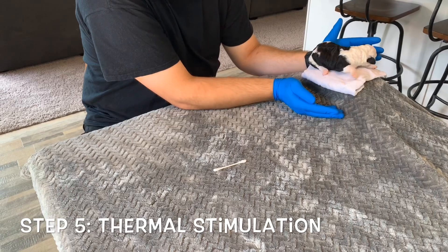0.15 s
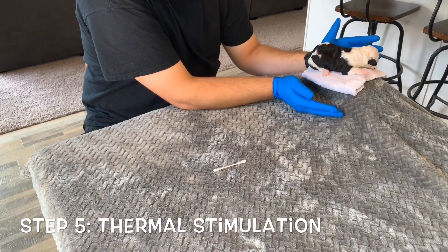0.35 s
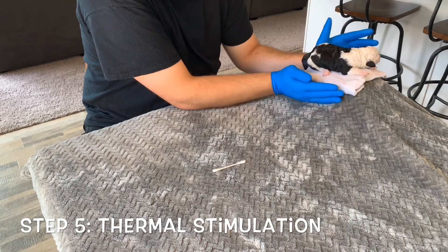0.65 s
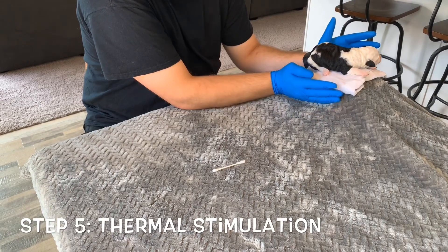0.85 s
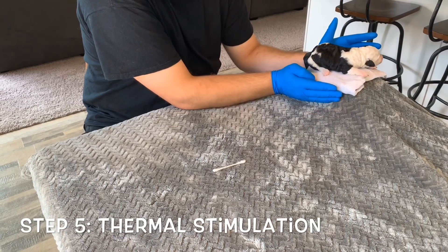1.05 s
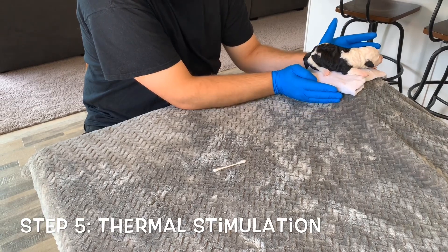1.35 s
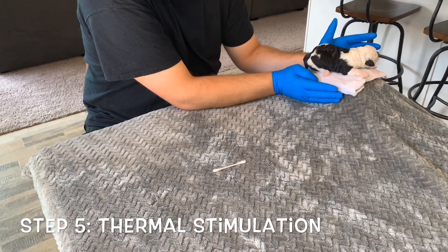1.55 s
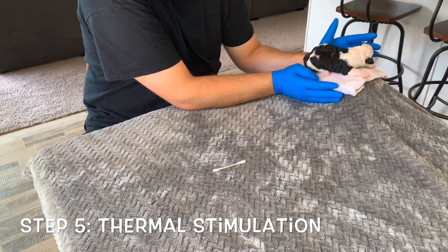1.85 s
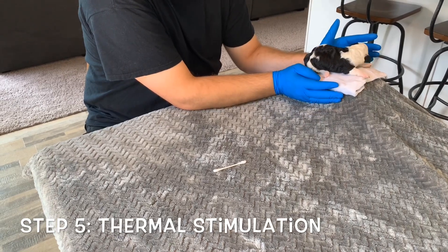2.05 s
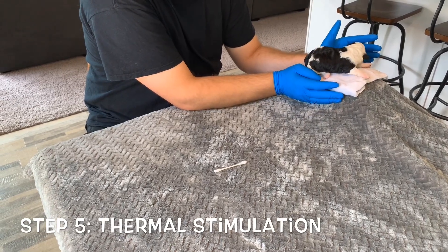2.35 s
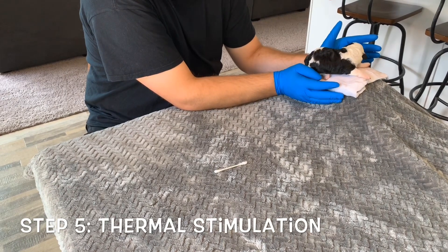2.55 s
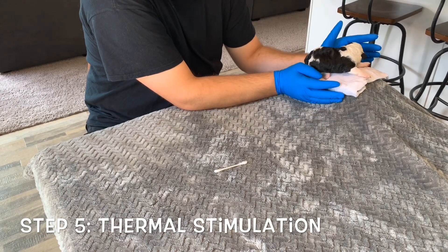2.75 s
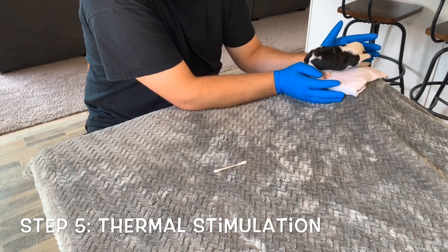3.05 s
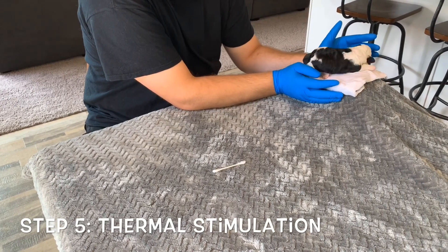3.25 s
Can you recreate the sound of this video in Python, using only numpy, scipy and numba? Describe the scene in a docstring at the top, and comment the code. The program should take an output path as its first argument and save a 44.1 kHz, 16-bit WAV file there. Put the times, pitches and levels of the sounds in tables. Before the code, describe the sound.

In a slightly echoing room with a faint ventilation hum, a newborn puppy gives eight short, evenly spaced cries. It starts with a soft whine, then switches between raspy squeals and clearer whimpers, ending on its strongest cry.

```python
"""Cries of a newborn puppy

A puppy cries eight times in a live room, whose walls ring on over a low, steady ventilation hum.
Each cry follows the source-filter principle: the vocal folds give a harmonic series that arches up and
down in pitch, and throat, mouth and nose shape its spectrum. Soft cries stay clear; in hard ones the
folds vibrate irregularly and break into a hoarse squeal with subharmonics."""
import sys
import numpy as np
from scipy import signal
from scipy.fft import rfft, irfft
from scipy.io import wavfile
from scipy.ndimage import uniform_filter1d
from numba import njit

SR = 44100
rng = np.random.default_rng(int(sys.argv[2]) if len(sys.argv) > 2 else 0)


def transcribe(signal):
    """Save signal, clipped to [-1, 1], as a 16-bit WAV file at the path in sys.argv[1]."""
    frames = np.atleast_2d(signal).T
    limited = np.clip(frames, -1, 1)
    pcm = np.round(limited * 32767).astype(np.int16)
    wavfile.write(sys.argv[1], SR, pcm)


N = 149940

# Spectrum of the ventilation: f/Hz, relative spectral level/dB
VENT_SPECTRUM = [(25, -51), (65, -21), (110, -20), (200, -15), (255, -4), (320, 1.5), (400, -11.5),
                 (600, -15.5), (1200, -26.5), (2200, -33.5), (4000, -38.5), (8000, -43), (13000, -47.5),
                 (15500, -66)]
# Reverberation time of the room by band: f/Hz, T60/s
REVERB_TIMES = [(200, 0.71), (1300, 0.46), (3000, 0.49), (7000, 0.37), (15000, 0.66)]
# Fixed colouring of the cries by throat and mouth, plus ripple from nearby reflections: f/Hz, gain/dB
CRY_COLOUR = [(50, -53), (150, -25.5), (330, -2), (420, -7), (550, -12), (700, -7), (820, -2.5), (970, -4),
              (1110, 2), (1260, -2), (1380, 0.5), (1480, 1), (1600, 2), (1770, 1), (1950, 1.5), (2130, 4),
              (2420, -1.5), (2650, -2.5), (2920, -7.5), (3220, -3.5), (3700, -12), (4200, -15), (4650, -21),
              (5100, -26), (5700, -17.5), (6300, -24), (7000, -25), (7800, -26), (9200, -48), (11500, -25),
              (13500, -28.5), (15500, -22)]
# One contour per cry: t/s, pitch/Hz, relative level/dB, treble gain/dB, mouth resonance/Hz
CRY_CONTOURS = [
    [(.095, 345, -62.5, -44, 1090), (.112, 460.6, -57.5, -29.5, 1200), (.135, 530.4, -51, -22.5, 1340),
     (.165, 543, -45, -24, 1510), (.195, 463.2, -50, -28.5, 1300), (.23, 371.6, -48.5, -11, 1019),
     (.275, 313.4, -58.5, -12, 1050)],
    [(.46, 430, -56.5, -44, 1500), (.482, 682, -48, -35, 1907), (.5, 1072, -36.5, -19.5, 2170),
     (.515, 1077, -57.5, 7, 2300), (.532, 800, -41.5, -12, 1605), (.548, 566.5, -43, -25, 1107)],
    [(.865, 335, -55.5, -7, 960), (.895, 433.4, -56, -24, 990), (.93, 466, -48.5, -21, 1311),
     (.96, 448, -48, -8, 1198), (.985, 379, -51, -5.5, 1078), (1.02, 342.7, -52.5, -9, 1005)],
    [(1.22, 480, -58.5, -26, 1097), (1.24, 700, -44, -33, 1200), (1.257, 1220, -44.5, -6, 1428),
     (1.29, 1452, -41.5, -9, 1381), (1.308, 1150, -44.5, -14.5, 1305), (1.33, 740, -39.5, -7.5, 1354),
     (1.365, 620, -51, 8.5, 1347), (1.405, 440.2, -50.5, 12, 1344)],
    [(1.715, 350, -60.5, -16, 1285), (1.748, 490, -46.5, -11, 1420), (1.772, 622, -44.5, -21, 1915),
     (1.79, 646.7, -44.5, -15, 1900), (1.817, 614, -44.5, -6, 1800), (1.845, 498.8, -44, -10, 1218),
     (1.888, 386, -50, -9, 1007)],
    [(2.098, 440, -57, 2, 1120), (2.122, 688.6, -43, -23, 1294), (2.145, 1123, -49, 0, 1202),
     (2.156, 1182, -40.5, 0, 1207), (2.17, 910, -39.5, 5, 1600), (2.19, 781.4, -41.5, 0, 1509),
     (2.22, 690, -48, 14, 1507), (2.26, 490.4, -50, 7, 1440)],
    [(2.528, 410, -54, -1, 1306), (2.555, 530.2, -45, -6, 1365), (2.58, 669.6, -43.5, -8, 1353),
     (2.615, 691, -40, -3, 1616), (2.64, 668.3, -49.5, 16, 1393), (2.67, 571, -40.5, 5.5, 1282),
     (2.705, 480, -46, 9, 1321), (2.755, 381.7, -53, 14.5, 1278)],
    [(2.968, 495.6, -45.5, -3, 1132), (2.983, 609.5, -44, -8, 1202), (3.003, 769, -40, 11.5, 1504),
     (3.022, 799.2, -35.5, 7.5, 1210), (3.05, 776, -41.5, 12, 1549), (3.1, 642.3, -42, 10.5, 2096),
     (3.152, 681.7, -42, 10, 2270), (3.178, 613, -43.5, 8.5, 2040), (3.215, 469.7, -48, 7, 1480)],
]
# One row per cry: hoarseness/1, throat resonance/Hz, nasal antiresonance/Hz, gain of the top band/dB
CRY_TIMBRES = [(.05, 7600, 1880, 0), (.35, 5600, 1870, 13), (.05, 7750, 1850, -2), (.55, 7650, 2000, 5),
               (.1, 7500, 1520, 1), (.5, 6900, 2150, -4), (.08, 6900, 2400, 0), (.4, 7000, 3850, -1)]


def undb(db):
    """Amplitude ratio of a level in decibels."""
    return 10 ** (np.asarray(db) / 20)


def unit(x):
    """Normalisation to an rms value of 1."""
    return x / np.sqrt(np.mean(x ** 2))


def filtered(x, gain):
    """Zero-phase filtering: the spectrum is multiplied by gain(f)."""
    return irfft(rfft(x, 2 * N) * gain(np.arange(N + 1) * SR / (2 * N) + 1e-6))[:N]


def at(points, hz):
    """Interpolation of a table on a logarithmic frequency axis."""
    f, values = np.array(points).T
    return np.interp(np.log(hz), np.log(f), values)


def wander(hz):
    """Random modulation: low-pass noise of rms 1 with its cutoff at hz."""
    return unit(filtered(rng.standard_normal(N), lambda f: 1 / (1 + (f / hz) ** 4)))


def split(x, hz, order):
    """Complementary crossover: the parts below and above hz sum to the input."""
    low = filtered(x, lambda f: 1 / (1 + (f / hz) ** order))
    return low, x - low


@njit
def resonance(x, hz, width_hz):
    """Damped second-order resonator with a moving centre frequency and unit peak gain."""
    y, band_state, low_state = np.empty(len(x)), 0., 0.
    for i in range(len(x)):
        tuning, damping = np.tan(np.pi * hz[i] / SR), width_hz / hz[i]
        band = (band_state + tuning * (x[i] - low_state)) / (1 + tuning * (tuning + damping))
        band_state, low_state = 2 * band - band_state, low_state + 2 * tuning * band
        y[i] = damping * band
    return y


def ventilation(level_db=-62.5):
    """Broadband noise of moving air, coloured by a low duct resonance."""
    air = filtered(rng.standard_normal(N), lambda f: undb(at(VENT_SPECTRUM, f)))
    return unit(air) * undb(level_db)


def room(direct, first_echo_s=0.0073, early_decay_s=0.015, absorption_hz=8970):
    """Reverberation: early reflections and a diffuse tail, decaying by band, join the direct sound."""
    t = np.arange(N) / SR
    noise, tail = rng.standard_normal(N), 0
    for band, (_, t60) in enumerate(REVERB_TIMES):
        share = [(hz, k == band) for k, (hz, _) in enumerate(REVERB_TIMES)]
        tail = tail + filtered(noise, lambda f: at(share, f)) * np.exp(-np.log(1000) * t / t60)
    early = rng.standard_normal(N) * (rng.random(N) < .02) * np.exp(-t / early_decay_s)
    arrived = t > first_echo_s
    reflections = (undb(-0.5) * unit(tail * arrived) + undb(-4.5) * unit(early * arrived)) / np.sqrt(N)
    response, _ = split(reflections, absorption_hz, order=2)  # the walls absorb the high treble
    return direct + signal.fftconvolve(direct, response)[:N]


def larynx(pitch, roughness, rolloff_db_per_octave=-5.5, dispersion_rad=.35):
    """Glottal source: jitter, subharmonics and pulsed breath noise grow with the folds' roughness."""
    jitter = (0.00621 + 0.0445 * roughness) * wander(hz=350)
    lurch = 0.0242 * roughness * wander(hz=72.14)
    hz = pitch * (1 + jitter + lurch)
    phase = 2 * np.pi * np.cumsum(hz) / SR

    def partial(k):
        """Soft closure: a phase lag quadratic in k spreads each pulse over its cycle."""
        amplitude = undb(rolloff_db_per_octave * np.log2(k))
        return amplitude * np.cos(k * phase - dispersion_rad * k ** 2) * (k * hz < SR / 2)

    harmonics = sum(partial(k) for k in np.arange(1, 40))
    half_orders = sum(partial(k + .5) for k in np.arange(1, 12))
    subharmonics = undb(4) * roughness * half_orders * wander(hz=46)
    shimmer = 1 + 0.26 * wander(hz=130)
    puffs = unit(rng.standard_normal(N) * (1 + np.cos(phase)))
    rasp, hiss = undb(4.5) * roughness, undb(-16.5)
    return (harmonics + subharmonics) * shimmer + puffs * (rasp + hiss)


def articulation(clear_hz=620, broken_hz=800, attack_s=0.014, release_s=0.02):
    """Control curves of source and filter; the voice breaks as pitch rises from clear_hz to broken_hz."""
    t = np.arange(N) / SR
    points = [point + timbre for cry, timbre in zip(CRY_CONTOURS, CRY_TIMBRES) for point in cry]
    times, *columns = np.array(points).T
    curves = (np.interp(t, times, column) for column in columns)
    hz, level_db, treble_db, mouth_hz, hoarseness, throat_hz, nasal_hz, top_db = curves
    pitch = uniform_filter1d(hz, size=400)
    broken = np.clip((pitch - clear_hz) / (broken_hz - clear_hz), 0, 1)
    roughness = np.clip(0.0558 + hoarseness * broken, 0, 1)
    gate = np.zeros(N)
    for cry in CRY_CONTOURS:
        start, end = cry[0][0], cry[-1][0]
        gate += np.clip((t - start) / attack_s + 1, 0, 1) * np.clip((end - t) / release_s + 1, 0, 1)
    envelope = gate * undb(level_db)
    return pitch, envelope, roughness, mouth_hz, throat_hz, nasal_hz, undb(treble_db), undb(top_db)


def puppy(closed_mouth_db=-7, bass_loss=0.23, flutter_db=0.5):
    """Source-filter voice: mouth and throat resonances and a nasal notch shape the glottal tone."""
    pitch, envelope, roughness, mouth_hz, throat_hz, nasal_hz, treble_gain, top_gain = articulation()
    source = larynx(pitch, roughness) * envelope
    sway = 1 + 0.043 * wander(hz=8.9)
    mouth = resonance(source, mouth_hz, width_hz=500.)
    throat = resonance(source, throat_hz * sway, width_hz=380.)
    voice = source + mouth + undb(13) * throat
    voice = voice - 0.5 * resonance(voice, nasal_hz, width_hz=600.)
    voice = filtered(voice, lambda f: undb(at(CRY_COLOUR, f)))
    body, upper = split(voice, hz=2639, order=8)
    bass, middle = split(body, hz=780, order=8)
    edge, top = split(upper, hz=10000, order=16)
    # An opening mouth loses bass as it gains treble.
    bass = bass * (treble_gain / undb(closed_mouth_db)) ** -bass_loss
    treble = sum(band * undb(flutter_db * wander(hz=35.2)) for band in (edge, top_gain * top))
    return undb(-1) * (bass + middle + treble_gain * treble)


def scene():
    """Superposition of the reverberant cries and the ventilation in one channel."""
    return (room(puppy()) + ventilation())[None]


def record(dry, cutoff_hz=15750):
    """Band limiting: the microphone acts as a steep low-pass filter."""
    return signal.sosfilt(signal.ellip(10, .2, 70, cutoff_hz, fs=SR, output="sos"), dry)


dry = scene()
out = record(dry)
transcribe(out)
```